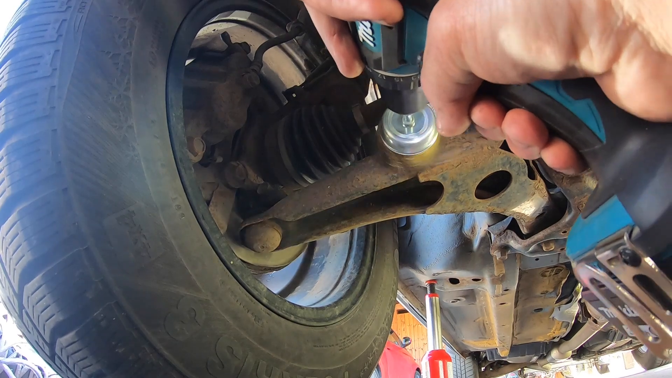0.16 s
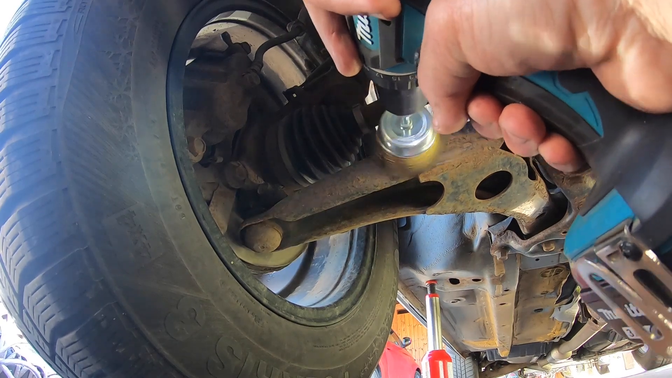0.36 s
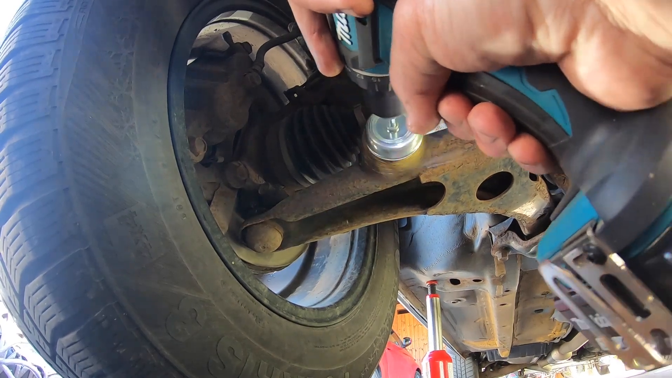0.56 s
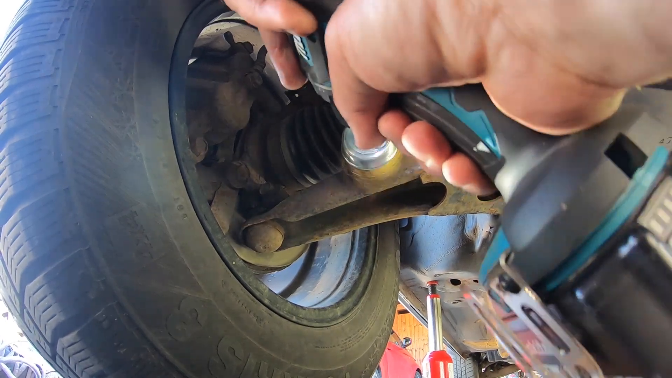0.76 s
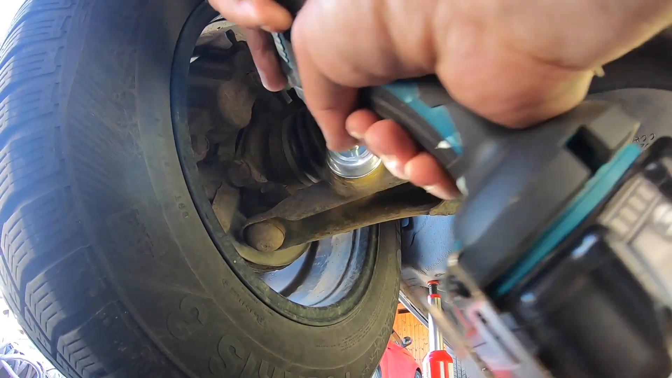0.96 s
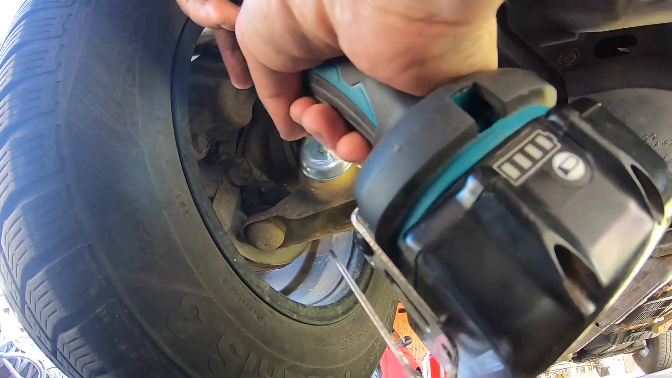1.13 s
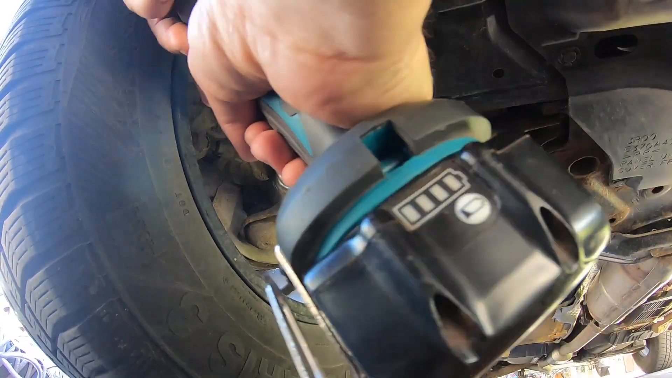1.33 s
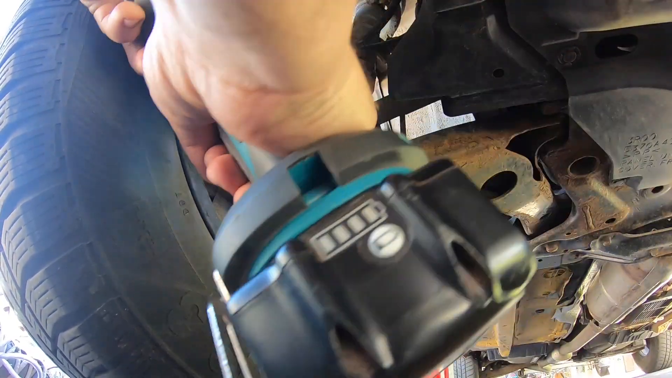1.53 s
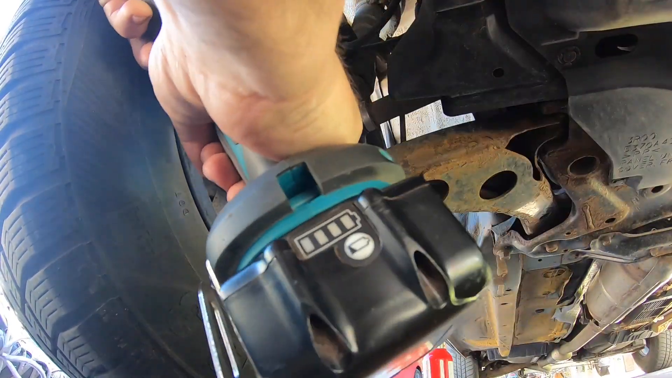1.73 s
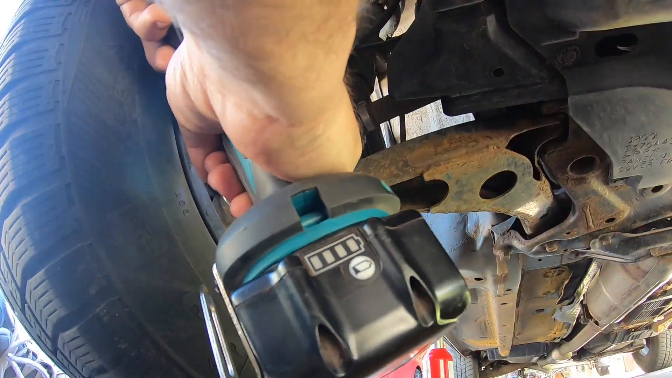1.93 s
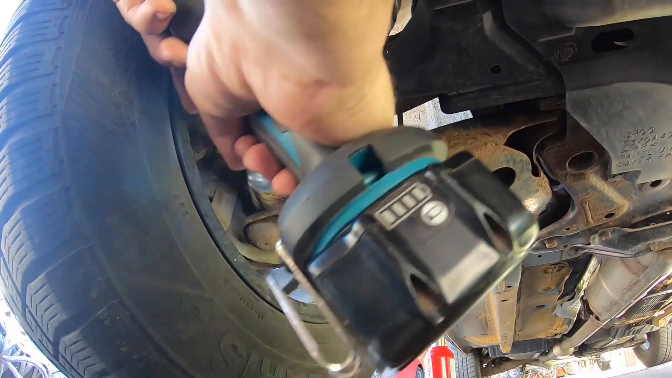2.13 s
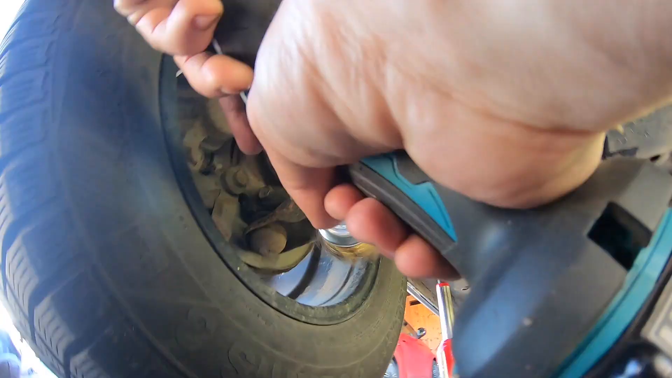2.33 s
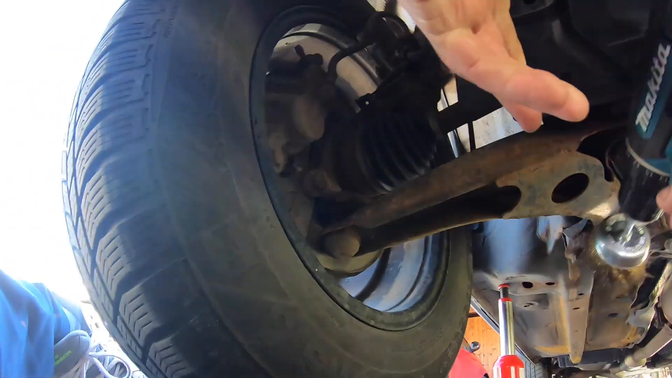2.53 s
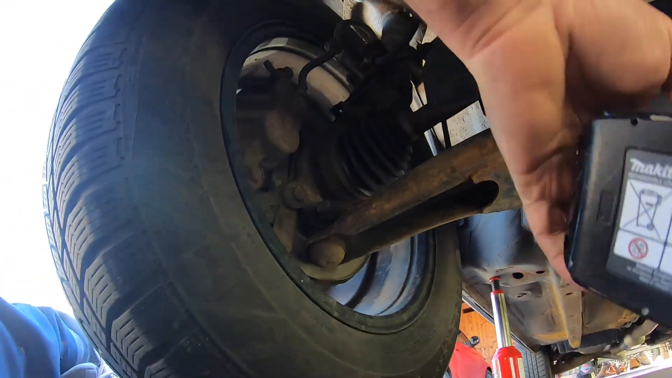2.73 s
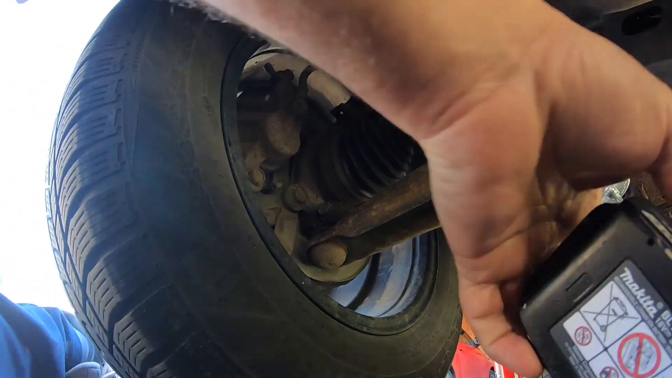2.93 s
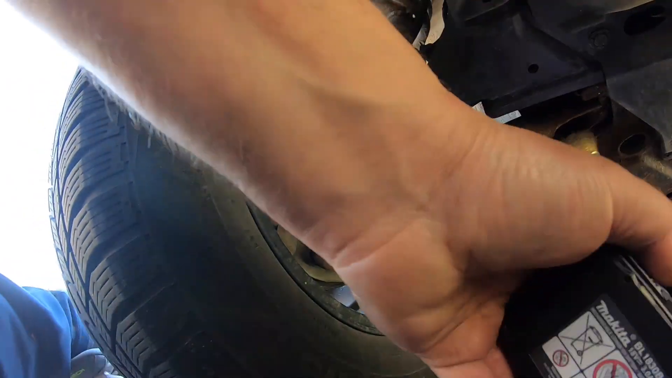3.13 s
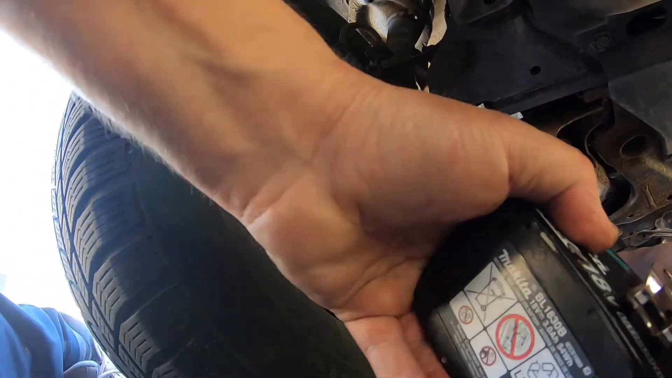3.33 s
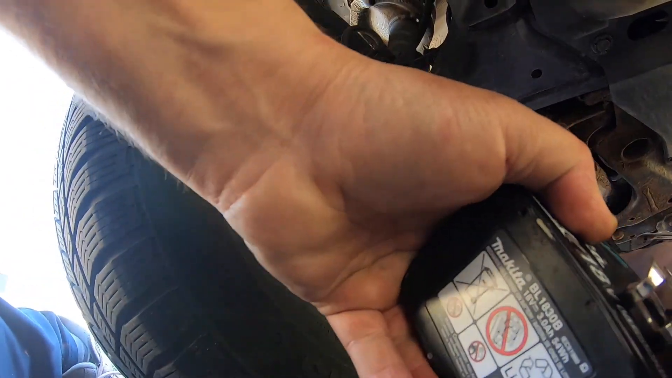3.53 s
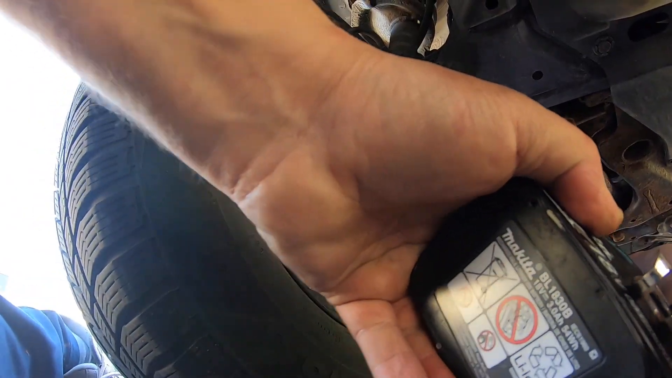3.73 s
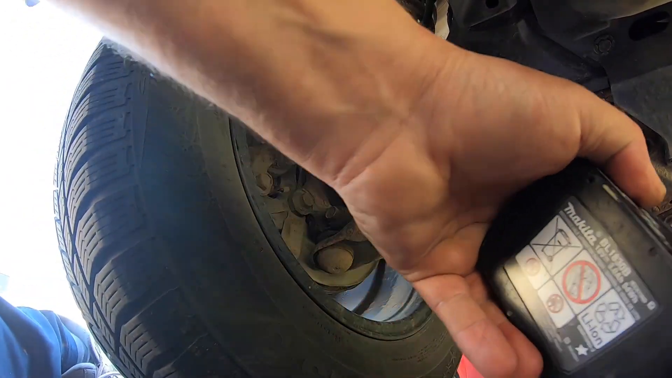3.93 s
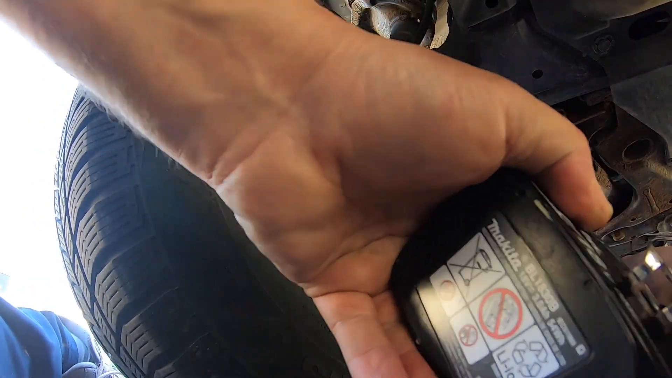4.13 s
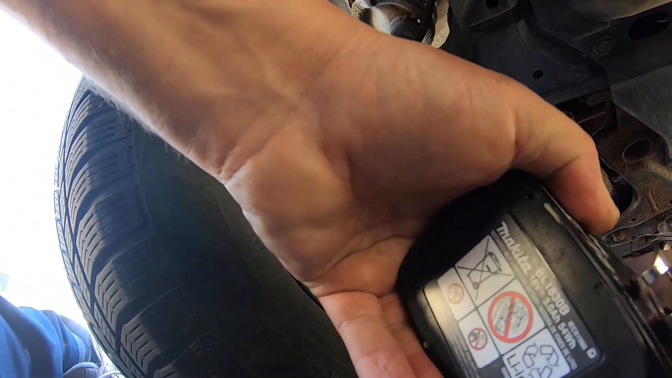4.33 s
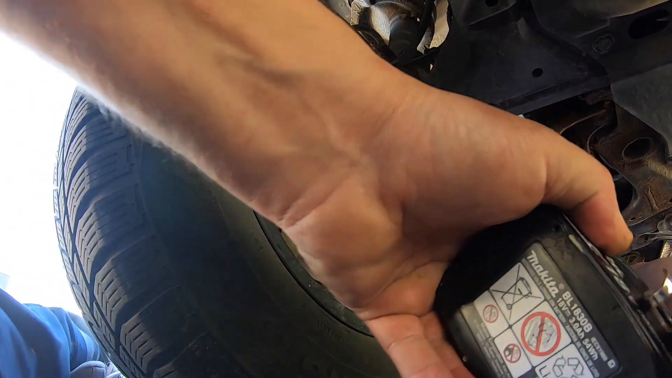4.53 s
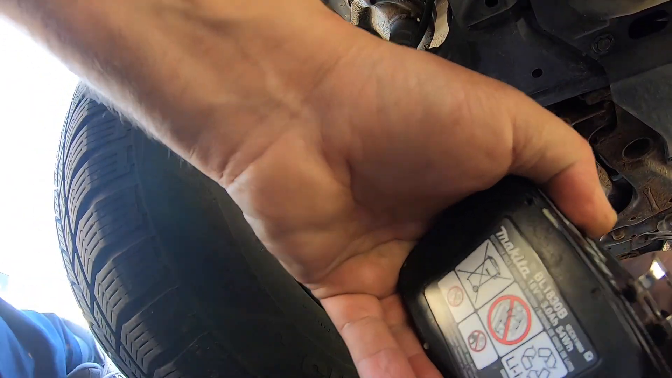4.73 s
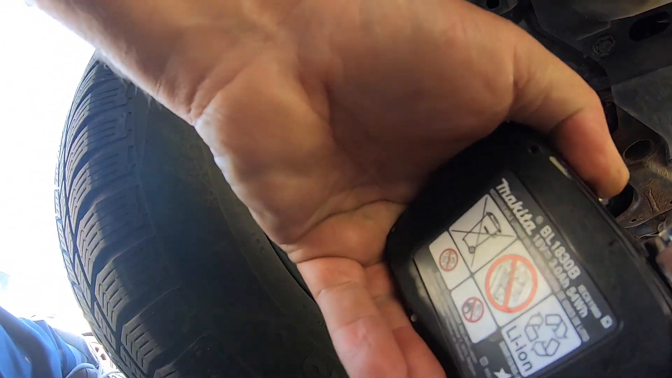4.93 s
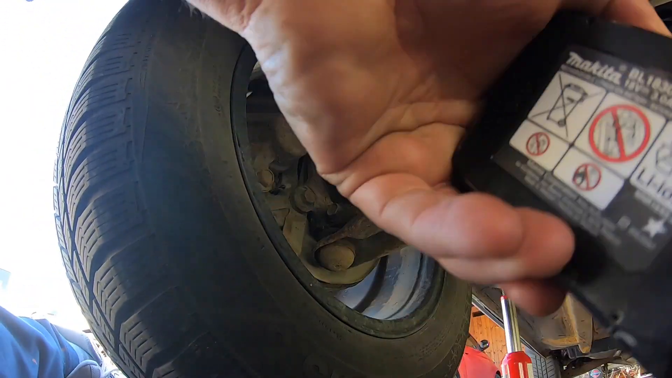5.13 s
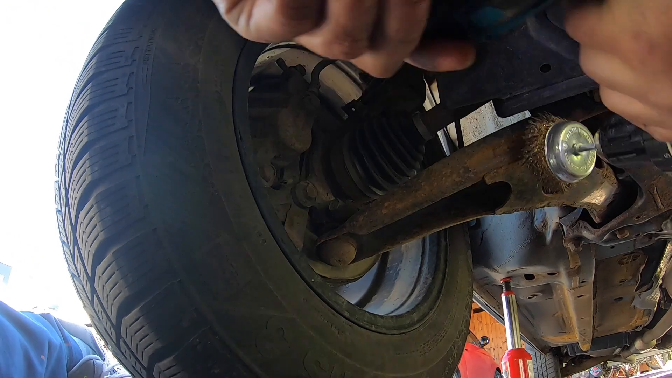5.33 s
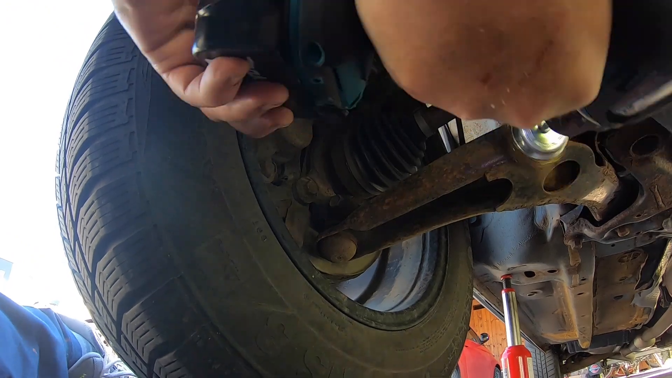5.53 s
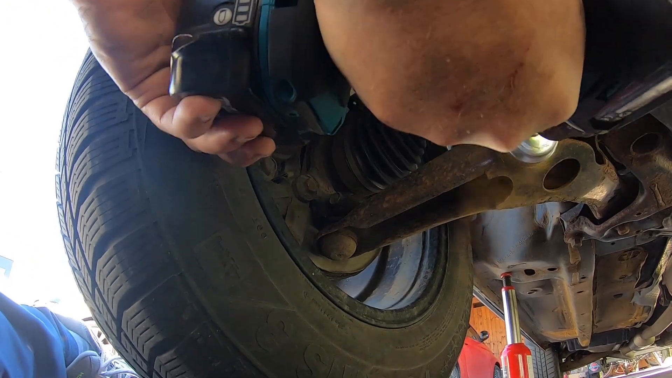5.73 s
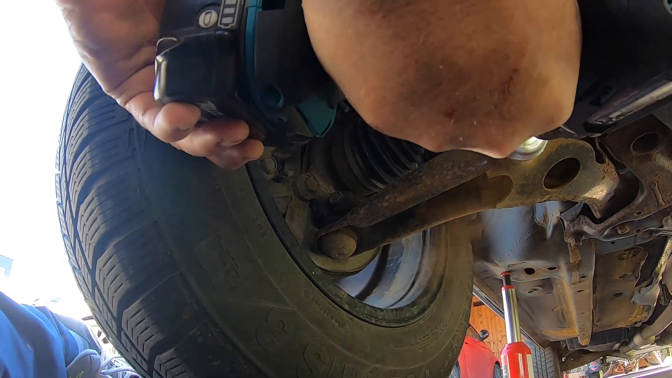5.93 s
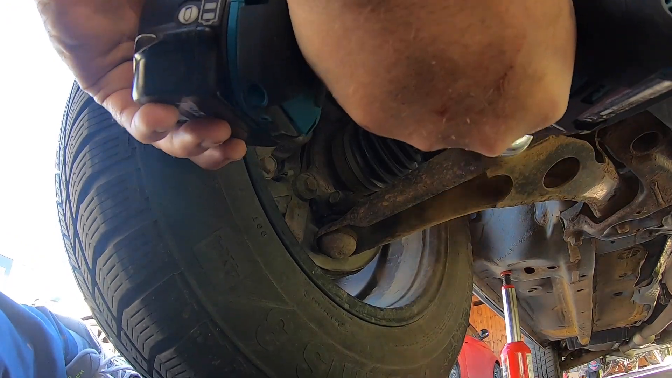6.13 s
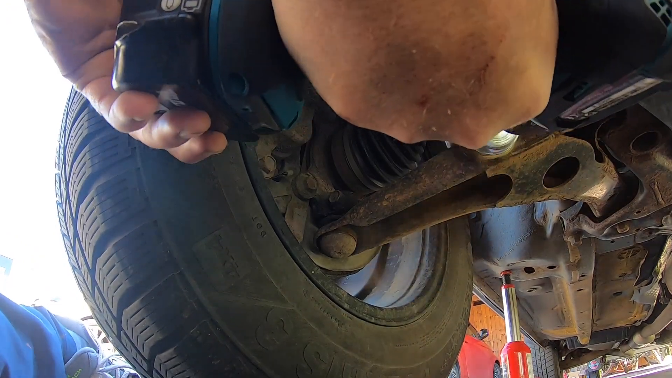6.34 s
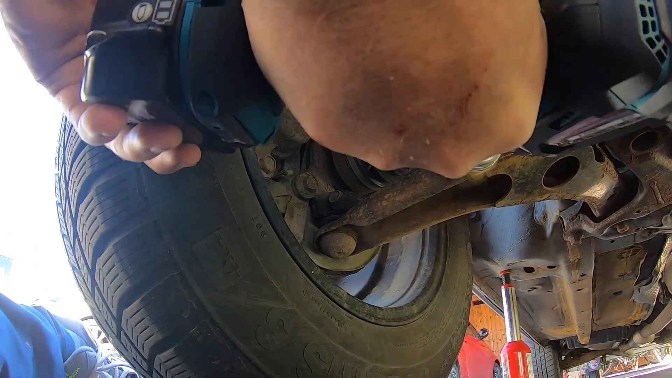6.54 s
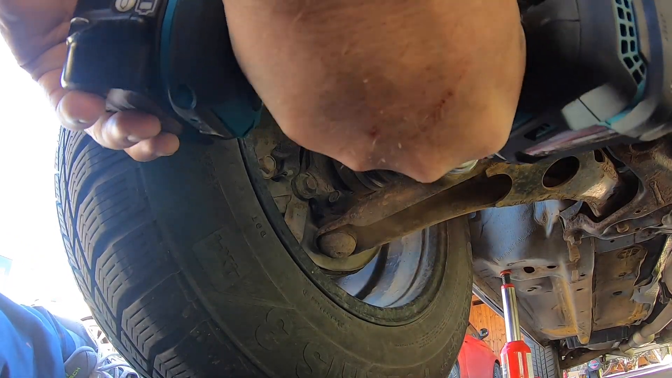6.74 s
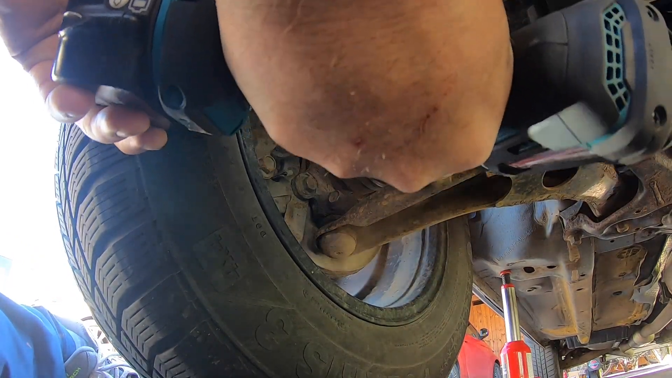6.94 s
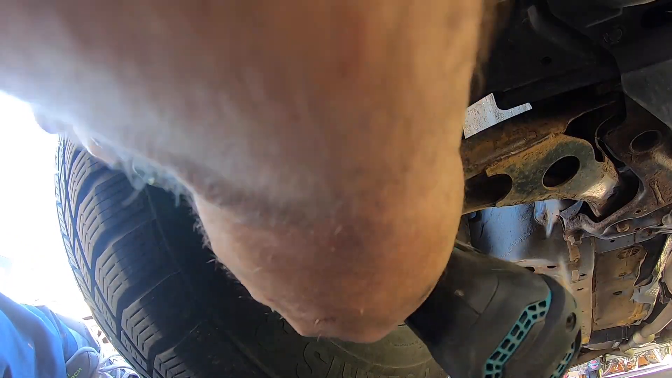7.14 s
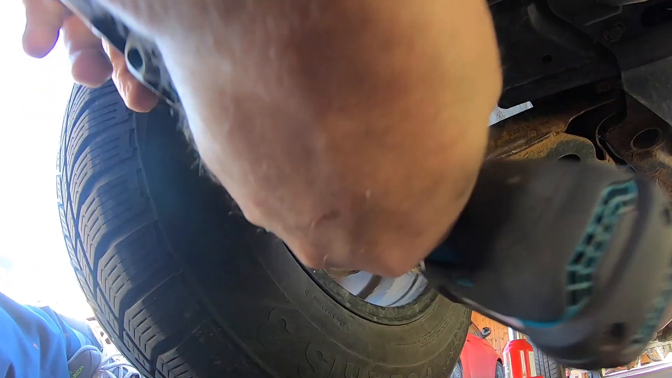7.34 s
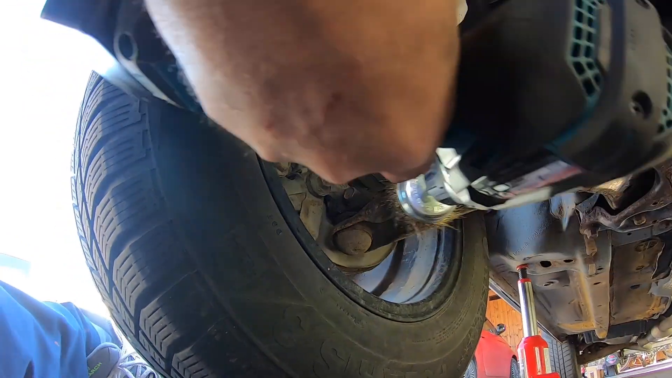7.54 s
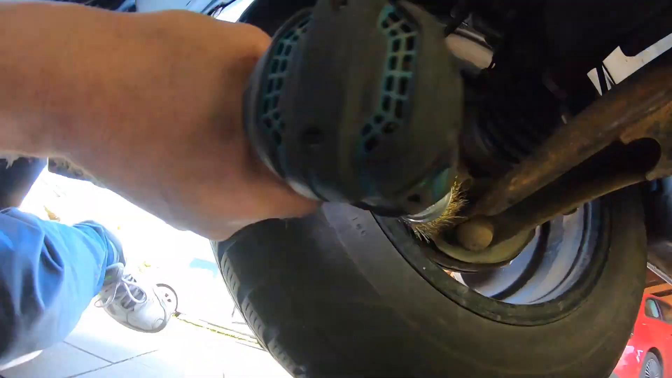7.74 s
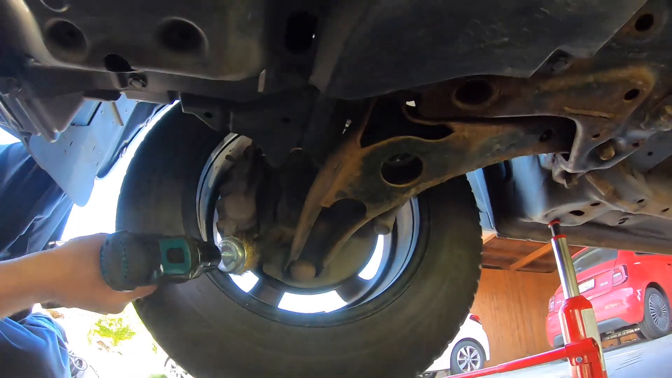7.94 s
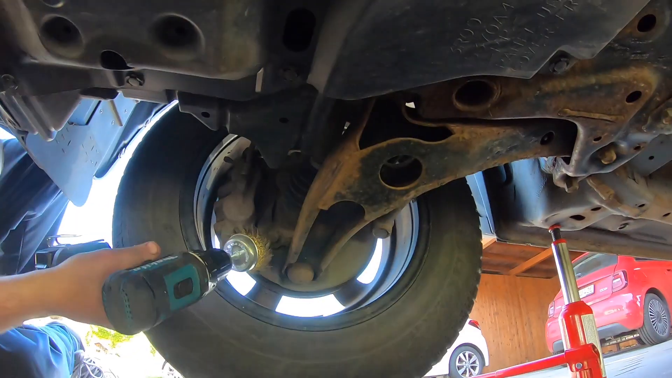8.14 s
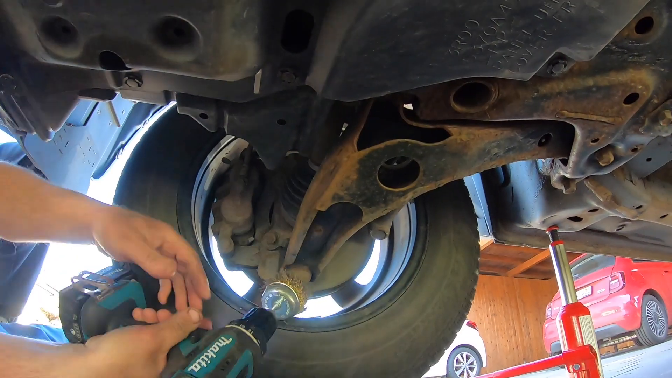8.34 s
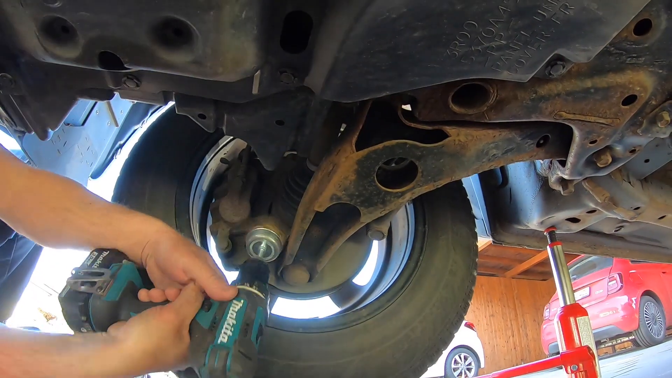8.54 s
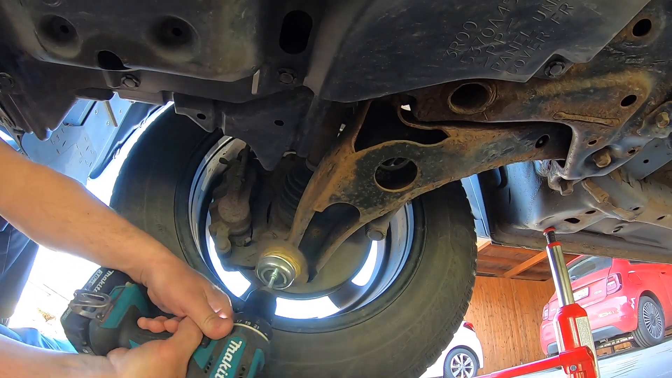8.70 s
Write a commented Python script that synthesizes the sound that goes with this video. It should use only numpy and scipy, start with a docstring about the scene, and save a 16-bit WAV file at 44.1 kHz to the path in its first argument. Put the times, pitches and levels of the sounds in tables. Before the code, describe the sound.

Close under a car, a cordless drill drives a wire brush over a rusty suspension arm. It begins loud and harsh, abruptly drops softer at about one second, then brakes with a click. Handling thumps and scrapes lead to a steady second run, then another with skin dragging in stuttering jerks on the camera. After a cluster of knocks, a final bright burst runs to the end. Small camera microphone, low handling rumble.

```python
"""A cordless drill spins a wire brush on a rusty suspension arm, close to a small camera under a car.
It starts at full speed: a rough rasp of noise grains over a whine of sine waves, then a softer burst to 2.6 s.
Ringing knocks and gritty scrapes come from hands on the camera and the drill starting or stopping; bursts
follow at 3.1 s and 5.57 s, the second with an arm dragging in jerks, and a last from 8.53 s to the end.
Filtered noise makes rumble and rustle throughout, with a faint far tone that is clearer from 7.8 s."""
import sys
import numpy as np
from scipy import signal
from scipy.fft import rfft, irfft, next_fast_len
from scipy.io import wavfile
from scipy.ndimage import uniform_filter1d

SR = 44100
rng = np.random.default_rng(int(sys.argv[2]) if len(sys.argv) > 2 else 0)


def master_out(mix):
    """Clip the mix to full scale and print it as 16-bit PCM to the path in sys.argv[1]."""
    frames = np.transpose(np.atleast_2d(mix))
    ceiling = np.clip(frames, -1, 1)
    pcm = np.round(ceiling * 32767).astype(np.int16)
    wavfile.write(sys.argv[1], SR, pcm)


N = 391166
T = np.arange(N) / SR  # time, s

# bursts of drilling, one list each: (t/s, whine f/Hz at full speed before wavering, loudness level/dB)
BURSTS = [
    [(0, 679, -21), (.335, 708, -19.5), (.4, 700, -20.5), (.62, 699, -20), (.68, 703.5, -20.5),
     (.81, 701.5, -20.5), (.945, 688, -21)],
    [(.945, 752, -29.5), (1.15, 764, -30.5), (1.36, 748, -30), (1.8, 758, -29.5), (2.05, 755, -29.5),
     (2.125, 701, -31), (2.28, 733, -29.5), (2.335, 731, -30.5), (2.39, 625, -29.5), (2.46, 634, -30),
     (2.525, 624, -28.5), (2.565, 550, -33), (2.6, 465, -61)],
    [(3.11, 780, -55), (3.15, 780, -27.5), (3.3, 803, -26.5), (3.39, 787, -27.5), (3.77, 775, -26),
     (3.84, 788.6, -27.5), (4.42, 784, -28), (4.53, 780, -29), (4.59, 790, -30), (5.1, 777, -30.5),
     (5.2, 758, -31.5)],
    [(5.57, 757, -30), (5.71, 757, -28), (5.8, 748, -29), (6.13, 753, -28.5), (6.33, 764, -28.5),
     (6.77, 778, -29), (7.05, 778, -28.5), (7.125, 792, -30.5), (7.37, 798, -28.5), (7.42, 745, -29)],
    [(8.53, 785, -43), (8.56, 785, -24.5), (8.66, 798, -26.5), (8.725, 660, -28.5), (8.755, 750, -25.5),
     (8.785, 790, -27), (8.87, 790, -26)],
]
# when the trigger of each burst is pulled: t/s; the first two bursts are already running
TRIGGER_TIMES = [-1, -1, 3.1, 5.58, 8.52]
# how the drill faces the camera: (burst number, fade-in from t/s, to t/s, fade-out from t/s, to t/s)
POSES = [(0, -1, 0, .943, .946), (1, .943, .946, 2.59, 2.6), (2, 3.1, 3.12, 4.3, 4.65),
         (2, 4.3, 4.65, 5.168, 5.176), (3, 5.568, 5.572, 7.394, 7.402), (4, 8.528, 8.535, 9, 10)]
# rotor slots and gear meshes: multiples of the whine frequency
WHINE_MULTIPLES = [.5, 1, 2, 3, 4, 5, 5.63, 8, 10, 10.5, 11.27, 11.5, 12, 18, 19, 20, 21, 23]
# per pose: one level/dB for each multiple, relative to its group below
WHINE_BALANCE = [
    [-2.5, 0, 6, -7, -11, 12.5, 7.5, -34, 0.004, -13, -5, -4.5, -14, -42, -33, -44, -44, -44],
    [-13, 0, -3.5, -26, 1, -1, -5, -21, 0.78, -14, 3, -7, -6, -15, -13, -8, -4, -11],
    [-19.5, 0.011, -7.5, -16, 1, -16, -9, -25, 0.31, -24, -4, -19, -25, -30, -30, -24, -30, -30],
    [-33, 0, -2, -54, 2, -22, -8, -53, 0, -20, -10, -20, -21, -9, -39, -3, -20, -30],
    [-18, 0, 3, -18, 12, -13, -22, -17, 0, -21, -10.5, -28, -43, -18, -9, -5, -20, -30],
    [-30, 0, 1.5, -7, 3, -16, -5, -13, 1, -15, 4, -15, -8, -22, -25, -22, -30, -30],
]
# per pose: low (to 2), middle (to 5.63), high (to 12) and top multiples:
# (level/dB as the pose begins, level/dB as it ends), before loudness and spin-up
WHINE_GROUPS = [
    [(-45, -45), (-42, -43), (-31, -30), (-30, -30)],
    [(-56, -57), (-49, -60), (-47, -43), (-45, -43)],
    [(-40, -40.5), (-37.5, -39.5), (-43, -41), (-41, -41)],
    [(-41, -49.5), (-44, -45), (-43, -46), (-44, -44)],
    [(-62, -59), (-58, -57), (-39, -37), (-37, -37)],
    [(-47, -44), (-42, -42), (-45, -45), (-45, -45)],
]
# per pose: colour of the rasp: (f/Hz, relative level/dB)
RASP_COLOURS = [
    [(400, -34), (620, -18), (1000, -17.5), (1350, -7.5), (2250, -1), (2600, -9.5), (3600, -6.5),
     (4900, -4), (6300, -9), (7500, -8), (9200, -12), (10000, -23.5), (12500, -31.5), (16000, -53)],
    [(400, -53), (620, -14), (1000, -14.5), (1700, -14), (2100, -10.5), (2600, -9.5), (3300, -4), (4000, 6),
     (4800, -3.5), (6000, -2.5), (8000, -1.5), (11000, -4), (14500, -5), (16000, -5)],
    [(400, -16.5), (520, -5), (650, -20), (1200, -15), (1700, -14.5), (2600, -7), (3450, -4.5), (4000, -3),
     (4800, -3.5), (5100, -14.5), (8000, -10), (10500, -14), (12500, -29), (16000, -30)],
    [(400, -18), (520, 5.5), (670, -39), (1230, -2), (1450, -12), (2000, -2.5), (2800, 2), (3600, 3.5),
     (5200, -2), (7700, 2), (9500, 2.5), (11000, -4), (13500, -5), (16000, -7)],
    [(400, -58), (640, -21), (1000, -26), (1400, -21.5), (2000, -18), (2450, -16), (3000, -6.5),
     (4300, -7.5), (5500, -7.5), (7200, -7), (9600, -13.5), (11500, -9.5), (15000, -12.5), (16000, -14)],
    [(400, -42), (520, -19), (900, -19), (1500, -7), (2200, -8.5), (2800, 1.5), (3500, -9), (4500, 1.5),
     (5400, -4.5), (8500, -6), (10500, -9.5), (12500, -19), (16000, -24)],
]
# per pose: difference of the two ports against their sum: (f/Hz, level/dB)
PORT_WIDTHS = [
    [(60, -26), (110, -20), (200, -16), (380, -8), (700, -4), (1290, 0.5), (2380, -11), (4400, -10.5),
     (8120, -1.5), (15000, 2)],
    [(60, -5), (110, -8), (200, -12), (380, -4), (700, -15), (1290, -6), (2380, 1.5), (4400, -5.5),
     (8120, -8), (15000, -0.5)],
    [(1000, -67)],
    [(60, 0), (110, -14), (200, -16), (380, -12), (700, -24), (1290, -7), (2380, -3), (4400, -1),
     (8120, -11), (15000, 1)],
    [(60, -18), (110, -20), (200, -22), (380, 8), (700, -10.5), (1290, 2), (2380, -5.5), (4400, -5.5),
     (8120, -8), (15000, -2)],
    [(1000, -63)],
]
# per pose: part of that difference that only leans the sound left (right if negative): (f/Hz, share -1 to 1)
PORT_LEANS = [
    [(800, 0.22), (2000, 0.49), (4000, 0.47), (8000, 0.28)],
    [(1000, 0.), (2000, 0.6), (4000, 0.076), (8000, .3)],
    [(1000, 0.)],
    [(1000, -0.61), (2000, -0.77), (4000, -0.87), (8000, -0.21)],
    [(1000, -0.5), (2000, -0.23), (4000, -0.27), (8000, -0.27)],
    [(1000, 0.)],
]
# an arm drags on the housing in jerks: (t/s of the peak, level/dB added there)
JERKS = [(5.622, -22), (5.65, -29.5), (5.68, -29.5), (5.755, -30), (5.78, -27.5), (5.82, -34), (5.885, -33),
         (6.082, -33), (6.142, -34), (6.23, -36), (6.33, -37), (6.46, -39), (6.56, -40), (6.699, -34)]
# the arm rests on the housing: (fade-in from t/s, to t/s, fade-out from t/s, to t/s)
LEANING_TIMES = (5.75, 5.8, 6.5, 6.6)
# resonances of the camera's housing: (f/Hz, width f/Hz, relative level/dB before division by root width)
HOUSING = [(104, 71, 10.5), (245.3, 42, 12), (486, 140, 7), (864, 350, 3), (1175, 690, 3.5), (1600, 600, 0)]
# knocks and clicks: hands on the housing, and the drill's trigger and brake:
# (t/s, thump level/dB, thump f/Hz, tick level/dB, tick f/Hz); levels before shaping
KNOCKS = [(0.529, -19.5, 146, -37, 3500), (0.975, -30, 162, -30, 1000), (2.567, -32, 225, -19.5, 1180),
          (2.589, -20, 180, -43, 1140), (2.758, -36, 382, -56, 5170), (2.926, -15.5, 301, -37, 2040),
          (3.078, -45, 312, -38, 6400), (5.17, -33.5, 537, -22, 1160), (5.455, -32, 207, -21.5, 1130),
          (5.47, -32.5, 240, -32.5, 7700), (5.572, -48, 272, -21.5, 1140), (7.422, -50, 474, -31.5, 3050),
          (7.703, -37, 260, -33, 5930), (7.727, -17, 110, -21, 3130), (7.782, -41, 149, -38, 8500),
          (7.961, -30, 756, -25.5, 2730), (8.012, -15.5, 338, -24, 1220), (8.025, -18, 123, -25, 1070),
          (8.131, -39.5, 433, -28.5, 5960), (8.267, -37, 110, -35.5, 2470), (8.409, -30, 138, -42, 1000)]
# gritty scrapes: fingers on metal and plastic, and the brush as it is braked:
# (start t/s, length t/s, level/dB before colouring, centre f/Hz)
SCRAPES = [(0.966, 0.033, -36, 890), (2.532, 0.064, -37.5, 1310), (2.646, 0.046, -50.5, 3500),
           (2.714, 0.054, -47.5, 3460), (2.766, 0.075, -50, 6000), (2.818, 0.036, -47, 3500),
           (3.08, 0.039, -49, 4000), (5.166, 0.028, -41, 4000), (5.449, 0.028, -42.5, 3020),
           (7.388, 0.042, -43, 4100), (7.7, 0.028, -39.5, 5000), (7.742, 0.064, -43.5, 4470),
           (7.845, 0.3, -48, 885), (8.041, 0.08, -43, 4050), (8.082, 0.045, -44, 3650),
           (8.2, 0.16, -44.5, 990), (8.47, 0.083, -55, 600)]
# rumble in the housing: (t/s, level/dB, deepest part's level/dB against it)
RUMBLE = [(0.0, -35, 8), (0.17, -34, 6), (0.28, -40.5, 0), (0.84, -49, 5.5), (1.31, -53.5, -25),
          (2.2, -50.5, -15), (2.62, -47.5, -7), (2.9, -41.5, -10), (3.1, -43.5, -8.5), (4.87, -46.5, -16),
          (5.33, -55, -13), (5.6, -50, -5), (6.78, -53, -13), (7.62, -63, -13), (7.72, -51, -1.5),
          (8.17, -52, -10), (8.5, -46.5, 3.5), (8.87, -50.5, -2)]
# colour of the main rumble: (f/Hz, relative level/dB)
RUMBLE_COLOUR = [(50, -50), (110, 1.5), (250, 2), (420, -5), (500, -4), (620, -14.5), (950, -15.5),
                 (1500, -24), (3000, -59)]
# colour of its deepest part: (f/Hz, relative level/dB)
DEEP_COLOUR = [(24, -31), (42, -3.8), (70, -1.5), (150, -3.5), (300, -53)]
# cloth rustles: (middle t/s, length t/s, level/dB added to the still air)
RUSTLES = [(2.9, 0.26, -57.5), (3.142, .1, -43), (5.188, 0.31, -62), (5.45, 1, -63), (7.815, 0.18, -67),
           (8.331, .15, -45.5), (8.53, 0.17, -55)]
# colour of cloth and air noise: (f/Hz, relative level/dB)
RUSTLE_COLOUR = [(400, -48), (600, -7.5), (1500, -12.5), (2300, -13), (4000, -14), (6000, -14.5),
                 (10000, -15.5), (12500, -23), (16000, -29)]
# a far tone: (f/Hz, level/dB once clear)
HUM = [(447, -55.5)]
# the dull sheltered port replaces the wide pair: (fade-in from t/s, to t/s, fade-out from t/s, to t/s)
SINGLE_PORT_TIMES = [(2.58, 2.65, 4.3, 4.65), (7.78, 7.82, 9, 10)]

SPIN_UP_S, FIRST_SPEED = .1, .56  # FIRST_SPEED is a share of full speed
FIRST_WHINE_DB, SPEED_WANDER = -11, .0016  # whine is fainter at first; the load wavers the speed by this share
GEAR_RATIO = 22.0  # motor turns per brush turn
LEANING_DB, JERK_RISE_S, JERK_FALL_S = -34, 0.0074, 0.013
SLIP_HZ = 92.  # middle rate of sticking and slipping
THUMP_T60_S, TICK_T60_S = 0.045, 0.015  # time to fall by 60 dB
GRIT_DB = 3.2  # spread of grain sizes in a scrape
RUMBLE_WIDE_DB = -16.5  # scales the difference of the ports
AIR_DB, AIR_WIDE = -63, 0.43  # middle level of still air; share that differs between the wide ports
HUM_NEAR_S, HUM_HIDDEN_DB = 7.8, -13  # the camera moves back; the tone is fainter before
TOP_HZ = 15750


def drill():
    """Motor speed drives both whine and brush; each pose colours them and spreads them over the ports."""
    out = np.zeros((2, N))
    for (burst, *fade), groups, balance_db, rasp_colour, width, lean in zip(
            POSES, WHINE_GROUPS, WHINE_BALANCE, RASP_COLOURS, PORT_WIDTHS, PORT_LEANS):
        on = (T > fade[0]) & (T < fade[3])
        share = np.interp(T[on], fade, [0, 1, 1, 0])
        times, speed_hz, level_db = np.transpose(BURSTS[burst])

        # 1 as the trigger is pulled, 0 at full speed
        spin_up = np.clip((T - TRIGGER_TIMES[burst]) / SPIN_UP_S, 0, 1)
        short = np.cos(np.pi / 2 * spin_up) ** 2
        speed = 1 - (1 - FIRST_SPEED) * short + SPEED_WANDER * walk(N, 12)
        turns = np.cumsum(np.interp(T, times, speed_hz) * speed)[on] / SR

        # the whine comes and goes with the rasp
        loud_db = np.interp(T[on], times, level_db)
        change_db = FIRST_WHINE_DB * short[on] + loud_db - np.median(loud_db)
        group_db = [np.linspace(a, b, on.sum()) + change_db for a, b in groups]
        whine_now, whine_ahead = (share * x for x in whine(turns, group_db, balance_db))

        # between poses, whine fades in amplitude but rasp in power
        rasp_size = np.sqrt(share) * undb(loud_db - 3.0)
        rasp_mid, rasp_other = (rasp_size * rasp(turns, rasp_colour) for _ in range(2))

        mid = rasp_mid + whine_now
        other = rasp_other + whine_ahead
        # the leaning part copies the middle; the remaining share is unlike it
        side = colour(mid, lean, gain=lambda c: np.clip(c, -1, 1))
        side += colour(other, lean, gain=lambda c: np.sqrt(1 - np.clip(c, -1, 1) ** 2))
        side = colour(side, width)
        out[:, on] += two_ports(mid, side)
    return out


def rasp(turns, rasp_colour):
    """Wire tips strike steel as rough grains; the gearbox makes the brush turn slower than the motor."""
    strikes = grains(turns / GEAR_RATIO, 0.61, 0.07)
    return colour(reflections(strikes), rasp_colour, 2200, 14500)


def whine(turns, group_db, balance_db):
    """Motor and gears make sines at multiples of the motor's rate, and copies a quarter cycle ahead."""
    n = len(turns)
    now, ahead = 0, 0
    for multiple, db in zip(WHINE_MULTIPLES, balance_db):
        group = np.searchsorted([2.5, 6.5, 13], multiple)
        # higher groups flicker more
        flicker_db = (1.3 + .6 * group) * walk(n, 9) + 1.5 * walk(n, 60)
        size = np.sqrt(2) * undb(db + group_db[group] + flicker_db)
        phase = 2 * np.pi * multiple * turns + .015 * multiple * walk(n, 150)
        now = now + size * np.sin(phase)
        ahead = ahead + size * np.cos(phase)
    return now, ahead


def grains(turns, spread_db, wobble):
    """Noise grains of uneven size stand for tiny contacts; wobble swells and weakens them once a turn."""
    n = len(turns)
    size_db = spread_db * rng.exponential(size=n) + walk(n, 30)
    x = rng.standard_normal(n) * undb(size_db)
    x = x * (1 + wobble * np.sin(2 * np.pi * turns))
    return x / x.std()


def reflections(x, t60_s=.15, wet_db=-4.):
    """Close echoes off car floor, wheel and ground, or inside a small part, ripple the colour."""
    t = T[:SR // 8]
    echo = rng.standard_normal(len(t)) * np.exp(-np.log(1000) * t / t60_s)
    echo *= undb(wet_db) / np.sqrt(np.sum(echo ** 2))
    echo[0] = 1  # direct sound
    return signal.fftconvolve(x, echo / np.sqrt(np.sum(echo ** 2)))[:len(x)]


def drag():
    """Skin sticks and slips in uneven soft pulses that ring the housing."""
    force = undb(LEANING_DB) * np.interp(T, LEANING_TIMES, [0, 1, 1, 0])
    for peak_s, db in JERKS:
        slope_s = np.where(T < peak_s, JERK_RISE_S, JERK_FALL_S)
        force += undb(db) * np.exp(-np.abs(T - peak_s) / slope_s)
    cycles = np.cumsum(SLIP_HZ * (1 + .14 * walk(N, 60))) / SR
    # one pulse each time a cycle is completed
    slips = np.diff(np.floor(cycles), prepend=0) * undb(1.3 * walk(N, 80))
    slips = uniform_filter1d(slips + 0.045 * rng.standard_normal(N), size=16)
    x = 0
    for hz, width_hz, db in HOUSING:
        rung = ring(ring(slips, hz, 2 * width_hz), hz, width_hz)
        x = x + undb(db) * rung / np.sqrt(width_hz)
    return x / x.std() * force


def knocks():
    """Hands hit the housing, and the drill's trigger and brake click: a fading low swing plus a short tick."""
    out, t = np.zeros(N + SR), T[:SR // 4]
    thump_fall, tick_fall = (np.exp(-np.log(1000) * t / t60) for t60 in (THUMP_T60_S, TICK_T60_S))
    for start_s, db, hz, tick_db, tick_hz in KNOCKS:
        thump = np.sin(2 * np.pi * hz * t) + .5 * np.sin(4 * np.pi * hz * t)
        thump += .5 * ring(rng.standard_normal(len(t)), hz, hz) * np.sqrt(SR / hz) / 2
        thump *= thump_fall * np.minimum(t / 0.0017, 1)  # 1.7 ms rise
        noise = reflections(rng.standard_normal(len(t)), 0.012, 2.6)
        tick = 0.56 * noise + 2.0 * ring(noise, tick_hz, 0.6 * tick_hz)
        i = int(start_s * SR)
        out[i:i + len(t)] += undb(db) * thump + undb(tick_db) * tick * tick_fall
    return out[:N]


def scrapes():
    """Fingers or the stopping brush rub rough surfaces: short gritty bursts around one broad resonance."""
    out = np.zeros((2, N))
    spread = wide_ports()
    for start_s, length_s, db, hz in SCRAPES:
        i, n = int(start_s * SR), int(length_s * SR)
        size = undb(db) * np.sqrt(np.hanning(n))
        parts = []
        for _ in range(2):
            grit = reflections(grains(T[:n], GRIT_DB, 0.), 0.011, 1.2)
            # np.diff brings out the treble
            bright = 0.087 * np.diff(grit, prepend=0)
            parts.append(size * (bright + 2.0 * ring(grit, hz, 0.75 * hz)))
        mid, side = parts
        out[:, i:i + n] += two_ports(mid, spread[i] * side)
    return out


def rumble():
    """Low noise for shaking of the housing; its deepest part has its own level."""
    times, db, deep_db = np.transpose(RUMBLE)
    mid, side = (colour(rng.standard_normal(N), RUMBLE_COLOUR, 73, 710) for _ in range(2))
    deep = colour(rng.standard_normal(N), DEEP_COLOUR, 25, 140)
    # shifting the deep noise by 1 s makes the side unlike the middle
    side = (side + 0.67 * np.roll(deep, SR)) * undb(RUMBLE_WIDE_DB) * wide_ports()
    mid = mid + deep * undb(np.interp(T, times, deep_db))
    size = undb(np.interp(T, times, db) + 2.0 * walk(N, 25))
    return size * two_ports(mid, side)


def rustle():
    """Small noise grains make cloth rustles over wavering still air."""
    mid, side = (colour(grains(T, 1.2, 0.), RUSTLE_COLOUR, 930, 12000) for _ in range(2))
    size = undb(AIR_DB + 4.0 * walk(N, 8))
    for middle_s, length_s, db in RUSTLES:
        size += undb(db) * np.cos(np.pi * np.clip((T - middle_s) / length_s, -.5, .5)) ** 2
    return size * two_ports(mid, side * AIR_WIDE * wide_ports())


def hum():
    """A faint far sine wavers in level and phase, clearer once the camera has moved back."""
    (hz, db), = HUM
    level_db = db + HUM_HIDDEN_DB * (T < HUM_NEAR_S) + 2.0 * walk(N, 31)
    phase = 2 * np.pi * hz * T + 0.47 * walk(N, 10)
    return np.sqrt(2) * undb(level_db) * np.sin(phase)


def wide_ports():
    """Width of the sound: 1 on the wide pair of ports, near 0 on the single one."""
    return 1 - .95 * sum(np.interp(T, fade, [0, 1, 1, 0]) for fade in SINGLE_PORT_TIMES)


def two_ports(mid, side):
    """Left port hears middle plus side, right port hears middle minus side."""
    return np.array([mid + side, mid - side])


def undb(db):
    """Turn decibels into an amplitude factor."""
    return 10 ** (np.asarray(db) / 20)


def read(table, hz):
    """Read between the rows of an (f/Hz, value) table on a log-frequency axis."""
    f, v = np.transpose(table)
    return np.interp(np.log(hz + 1), np.log(f + 1), v)


def colour(x, table, lo_hz=0., hi_hz=0., gain=undb):
    """Filter by a table; with a band given, scale so that unit noise has rms 1 inside it."""
    n = next_fast_len(len(x))
    hz = np.arange(n // 2 + 1) * SR / n
    g = gain(read(table, hz))
    if hi_hz:
        band = (hz > lo_hz) & (hz < hi_hz)
        g = g / np.sqrt(np.sum(g[band] ** 2) / len(g))
    return irfft(rfft(x, n) * g, n)[:len(x)]


def walk(n, rate):
    """Random wavering: levels held for 1 / rate seconds and smoothed twice; spread near 1."""
    k = int(SR / rate)
    steps = np.repeat(rng.standard_normal(n // k + 1), k)
    return 1.1 * uniform_filter1d(uniform_filter1d(steps, k), k)[:n]


def ring(x, hz, width_hz):
    """One resonance, gain 1 at the centre."""
    return signal.lfilter(*signal.iirpeak(hz, hz / width_hz, SR), x)


def scene():
    """Add all sources at the two ports."""
    return drill() + drag() + knocks() + scrapes() + rumble() + rustle() + hum()


def record(dry):
    """A steep low-pass filter cuts the treble above TOP_HZ."""
    return signal.sosfilt(signal.ellip(10, .2, 70, TOP_HZ, fs=SR, output="sos"), dry)


dry = scene()
out = record(dry)
master_out(out)
```